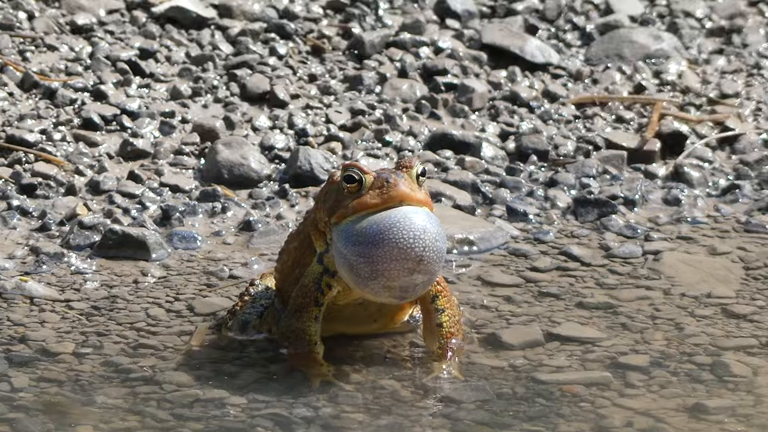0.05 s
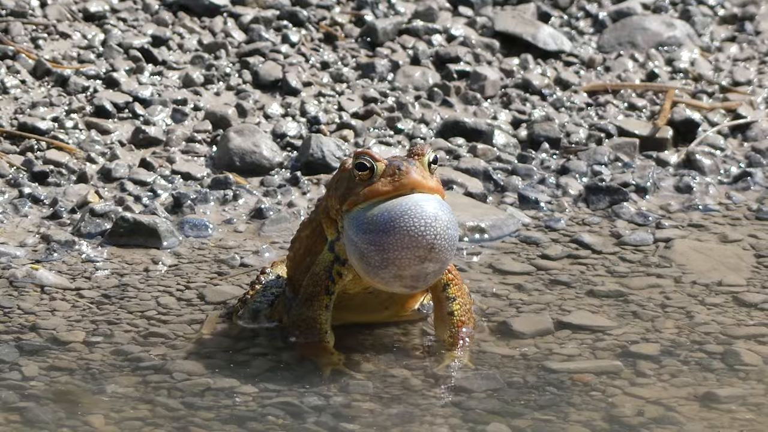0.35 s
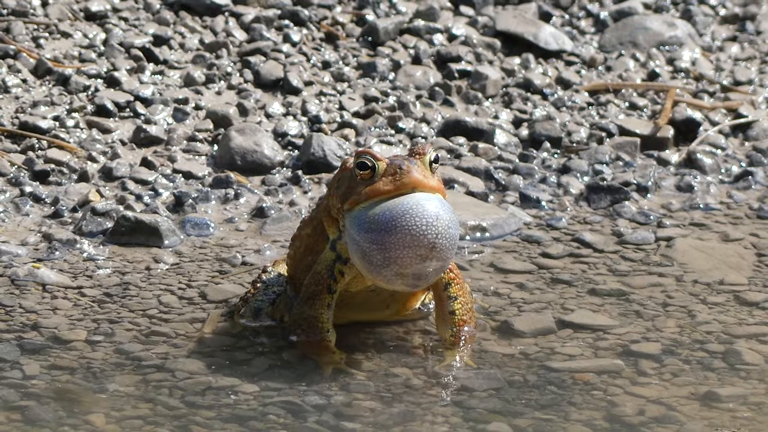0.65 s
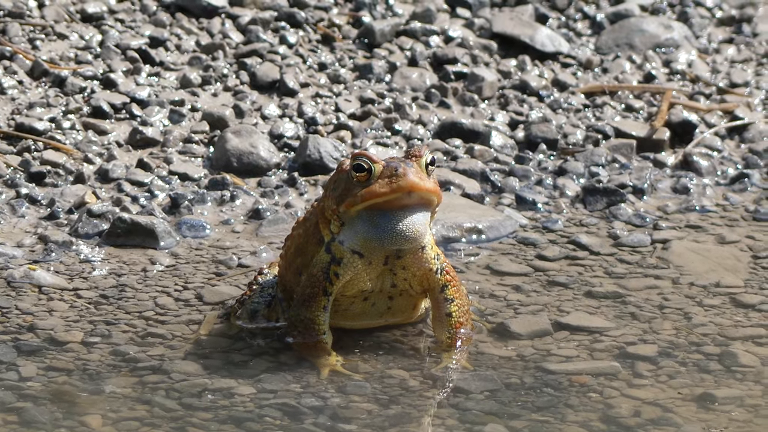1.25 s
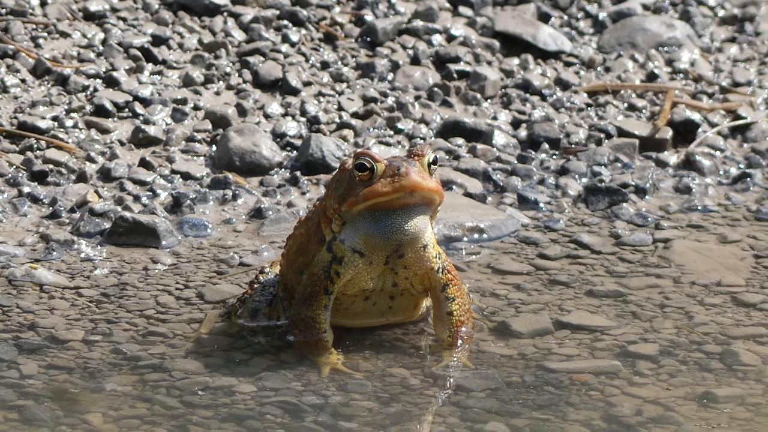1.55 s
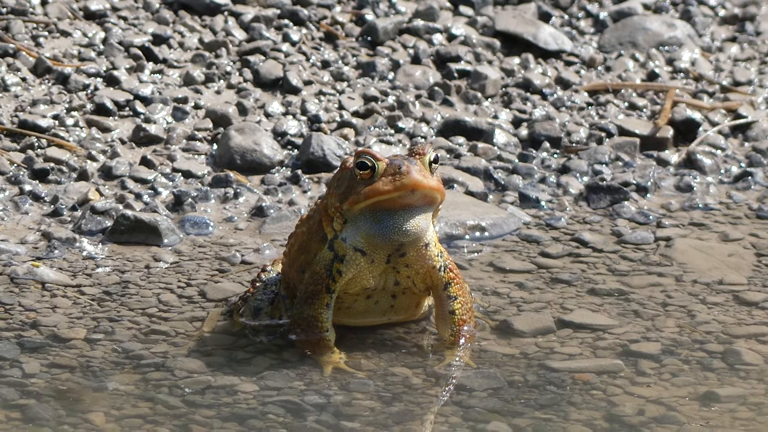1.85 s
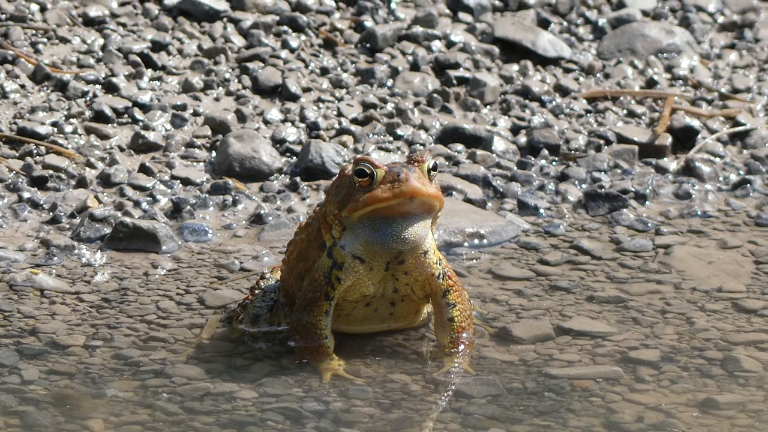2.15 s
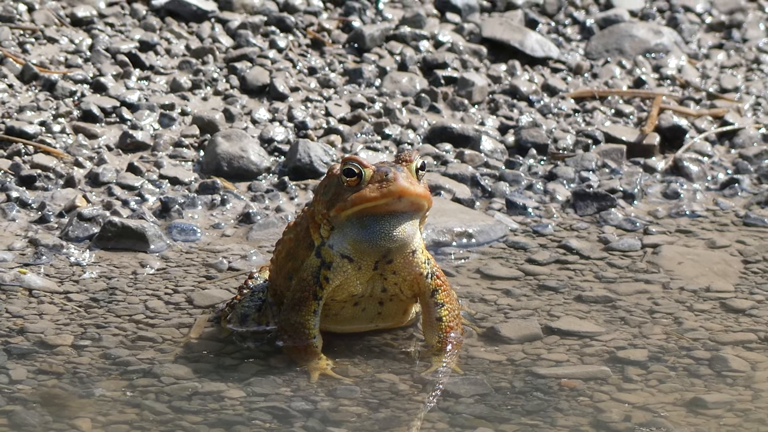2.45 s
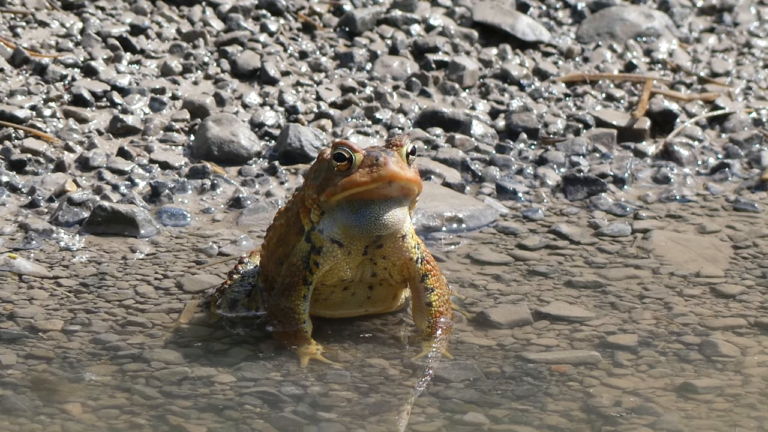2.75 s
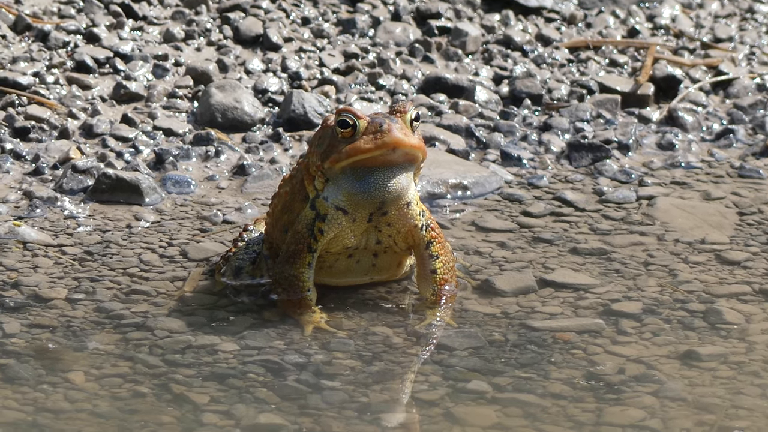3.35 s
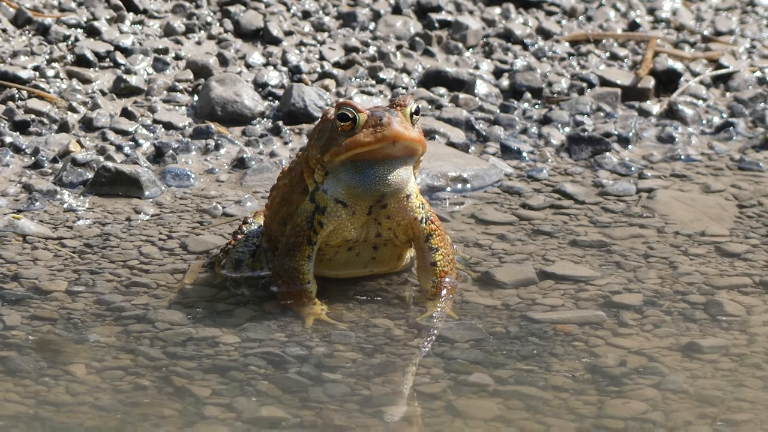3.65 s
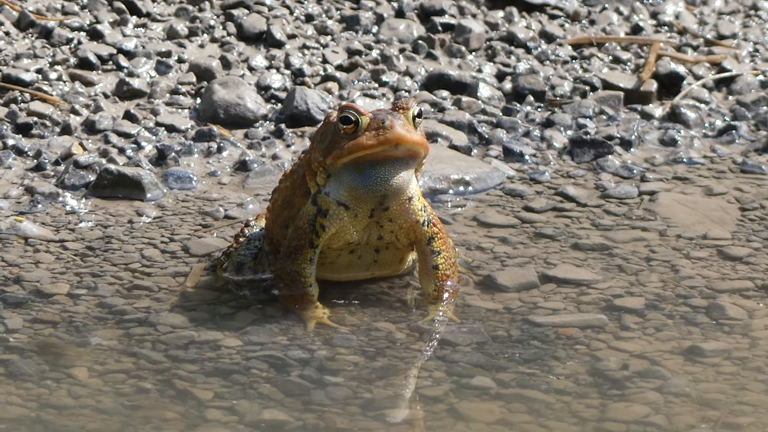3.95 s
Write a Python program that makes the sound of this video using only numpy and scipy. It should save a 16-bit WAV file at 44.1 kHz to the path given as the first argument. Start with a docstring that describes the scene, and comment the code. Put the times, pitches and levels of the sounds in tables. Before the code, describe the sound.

A toad's high, pulsing trill sounds close to the microphone and soon ends, leaving a softer, steady trill to the left. As that runs down, a farther toad starts and one bird chirp echoes across the quiet pond.

```python
"""Pond edge, over quiet outdoor hiss, a far hum and faint plops and ticks.
A close toad stutters through the end of its trill (to 0.8 s), its vocal sac ringing after each pulse.
A second toad, left, trills evenly from the start and runs down by 3.7 s; a distant bird whistles faintly.
From 3.3 s a third toad, further off, takes over.
At 3.4 s a bird gives one sharp chirp from both sides of its syrinx; the trees echo it."""
import sys
import numpy as np
from scipy import signal
from scipy.fft import rfft, irfft
from scipy.io import wavfile

SR = 44100
rng = np.random.default_rng(int(sys.argv[2]) if len(sys.argv) > 2 else 0)


def digitize_waveform(pressure):
    """Quantize a signal to 16-bit integers and store it at the path in sys.argv[1].

    Rows of a 2-D input are taken as channels; values are limited to [-1, 1].
    """
    field = np.atleast_2d(pressure).T
    bounded = np.clip(field, -1, 1)
    quanta = np.round(bounded * 32767).astype(np.int16)
    wavfile.write(sys.argv[1], SR, quanta)


N = 176400
T = np.arange(N) / SR


def amp(db):
    """dB to gain."""
    return 10 ** (np.asarray(db) / 20)


def unit_rms(x):
    """Scale to rms 1."""
    return x / np.sqrt(np.mean(abs(x) ** 2) + 1e-20)


def log_interp(points, hz):
    """Interpolate (f/Hz, value) points over log frequency."""
    f, value = np.transpose(points)
    return np.interp(np.log(hz + 1), np.log(f + 1), value)


def add(mix, at_s, sound):
    """Mix a sound in, in place."""
    part = mix[max(round(at_s * SR), 0):][:len(sound)]
    part += sound[:len(part)]


def colour(x, spectrum):
    """Filter by (f/Hz, level/dB) points; white noise keeps its power."""
    gain = unit_rms(amp(log_interp(spectrum, np.fft.rfftfreq(2 * N, 1 / SR))))
    return irfft(rfft(x, 2 * N) * gain)[..., :N]


def band(hz, half_width_hz):
    """Noise band, rms 1."""
    detune = (np.fft.rfftfreq(N, 1 / SR) - hz) / half_width_hz
    return unit_rms(irfft(rfft(rng.standard_normal(N)) / (1 + detune ** 2), N))


def place(x, left_db, right_db, lag_rad):
    """Pan by level and a phase lag on the right."""
    lagged = (signal.hilbert(x) * np.exp(-1j * lag_rad)).real
    return np.array([amp(left_db) * x, amp(right_db) * lagged])


def echo(x, t60_s, delay_s):
    """Diffuse reflections, independent per side, at the source's rms."""
    t = np.arange(SR) / SR
    tails = rng.standard_normal((2, SR)) * amp(-60 * t / t60_s) * (t > delay_s)
    return np.std(x) * np.array([unit_rms(signal.fftconvolve(x, tail)[:N]) for tail in tails])


def air(hiss_db=-46.0, hum_hz=73.0, hum_db=-61.5, whine_hz=474, whine_db=-65):
    """Soft outdoor hiss, far engine hum, wavering far tone."""
    # hiss spectrum: f/Hz, density/dB
    spectrum = [(25, -19.5), (50, -9), (90, -3), (130, -3.5), (250, 1.5), (400, -1), (620, -5), (900, -0.5),
                (1500, 3.5), (2200, -19.5), (3200, -14.5), (4800, -23), (6500, -21.5), (7700, -27),
                (10000, -22), (12500, -26), (15500, -27)]
    # hiss stereo image: f/Hz, left-right correlation
    correlation = [(40, -0.49), (130, -0.61), (290, -0.74), (640, -0.0069), (1400, 0.71), (3100, 1),
                   (6800, 0.5), (15000, 0.058)]
    left, independent = rfft(rng.standard_normal((2, N)))
    rho = np.clip(log_interp(correlation, np.fft.rfftfreq(N, 1 / SR)), -1, 1)
    right = rho * left + np.sqrt(1 - rho ** 2) * independent
    hiss = colour(irfft(np.array([left, right]), N), spectrum) * amp(hiss_db + 0.62 * band(0, 0.81))
    hum = amp(hum_db) * np.sin(2 * np.pi * hum_hz * T) * (1 + .15 * band(0, 3))
    return hiss + place(hum, -1.3, 1.9, 0.47) + amp(whine_db) * band(whine_hz, 4.5)


def distant_bird(arch=0.54, blur_hz=360):
    """Faint rising and falling whistles, blurred by distance."""
    # calls: t/s, length/s, top f/Hz, level/dB
    calls = [(1.192, 0.53, 3850, -59.5), (2.657, 0.072, 3550, -63), (2.827, 0.16, 3030, -56),
             (3.871, 0.15, 5020, -63.5)]
    whistles = np.zeros(N)
    for start_s, length_s, top_hz, db in calls:
        swell = np.sin(np.pi * np.arange(0, length_s, 1 / SR) / length_s)
        phase = 2 * np.pi * np.cumsum(top_hz * (1 - arch + arch * swell)) / SR
        blur = band(0, blur_hz)[:len(swell)]
        add(whistles, start_s, amp(db) * np.sqrt(abs(swell)) * blur * np.sin(phase))
    return place(whistles, 4.6, -2.3, 0)


def shore(plop_rise_s=0.0041, tick_rise_s=0.0006, tick_decay_s=0.0035):
    """Waterline plops and wet-gravel ticks: decaying noise bursts."""
    # plops and bumps: t/s, f/Hz, level/dB, decay/s
    plop_events = [(0.394, 527, -45, 0.03), (0.822, 348, -44.5, 0.019), (1.035, 476, -44, 0.021),
                   (3.714, 137, -36, 0.01), (3.926, 109, -48.5, 0.044)]
    # gravel ticks: t/s, level/dB
    tick_events = [(0.23, -52.5), (1.069, -48), (1.923, -51)]
    # tick spectrum: f/Hz, level/dB
    tick_spectrum = [(1000, -22.5), (3500, -2), (6000, -2), (11000, -14), (16000, -18.5)]
    plops, ticks = np.zeros((2, N))
    t = np.arange(0, .2, 1 / SR)
    for start_s, hz, db, decay_s in plop_events:
        envelope = amp(db) * (1 - np.exp(-t / plop_rise_s)) * np.exp(-t / decay_s)
        add(plops, start_s, envelope * unit_rms(band(hz, .3 * hz)[:len(t)]))
    for start_s, db in tick_events:
        envelope = amp(db) * (1 - np.exp(-t / tick_rise_s)) * np.exp(-t / tick_decay_s)
        add(ticks, start_s, envelope * rng.standard_normal(len(t)))
    return place(plops + colour(ticks, tick_spectrum), 0, 0, 0)


def syrinx_side(curve, rough, waver=0.00484):
    """Gain and phase of one whistle, rougher below its top pitch."""
    at_s, hz, db = np.transpose(curve)
    pitch_hz = np.interp(T, at_s, hz)
    pitch_hz *= 1 + waver * band(0, 214) + rough * (1 - pitch_hz / hz.max()) * band(0, 547)
    return amp(np.interp(T, at_s, db, left=-200, right=-200)), 2 * np.pi * np.cumsum(pitch_hz) / SR


def bird(rasp_db=-39, sum_db=-19, octave_db=-21, trees_db=-6):
    """A raspy start opens into two whistles and their sum tone; the trees ring on."""
    # lower whistle: t/s, f/Hz, level/dB
    low_curve = [(3.425, 2515, -47), (3.44, 3170, -41), (3.449, 3950, -35.5), (3.462, 3872, -31),
                 (3.475, 3833, -28.5), (3.479, 3795, -32), (3.485, 3935, -41), (3.492, 2845, -41),
                 (3.503, 2150, -44)]
    # upper whistle: t/s, f/Hz, level/dB
    high_curve = [(3.43, 4306, -62), (3.437, 5190, -32), (3.443, 6220, -36), (3.452, 6400, -35),
                  (3.46, 6450, -40), (3.478, 6500, -50), (3.5, 6260, -46)]
    # rasp spectrum: f/Hz, level/dB
    rasp_spectrum = [(100, -55), (1500, -5), (2800, -14), (5500, 1), (6800, -7), (8000, -13.5),
                     (12000, -15), (16000, -26)]
    # tree echo spectrum: f/Hz, level/dB
    tree_spectrum = [(1000, 7), (4000, -12), (6400, -8), (7000, -13), (16000, -24)]
    rasp_peak_s, rise_s, decay_s = 3.438, .028, 0.029
    low, low_phase = syrinx_side(low_curve, rough=.36)
    high, high_phase = syrinx_side(high_curve, rough=.14)
    dry = low * np.sin(low_phase) + high * (np.sin(high_phase) + amp(octave_db) * np.sin(2 * high_phase))
    dry += amp(sum_db) * np.sqrt(low * high) * np.sin(low_phase + high_phase)
    t = T - rasp_peak_s
    burst = np.clip(1 + t / rise_s, 0, 1) * np.exp(-np.maximum(t, 0) / decay_s)
    dry += amp(rasp_db) * burst * colour(rng.standard_normal(N), rasp_spectrum)
    trees = np.std(dry) * unit_rms(colour(echo(dry, 1.0, 0.022), tree_spectrum))
    return place(dry, 2.2, -2.7, 0) + amp(trees_db) * trees


def trill(rate, voice, first_s, last_s, uneven_db, jitter_s, snap_db, rasp_db,
          ring_db, ring_s, sharp_hz, settle_s):
    """Even pulses: the throat snaps open, the vocal sac swells on one tone and a faint tail lingers after it."""
    # throat modes: f/Hz, level/dB, decay/s
    throat_modes = [(814, -24.5, 0.0043), (901, -21, .004), (1584, -15.5, 0.0032), (1588, -27, 0.0048),
                    (2433, -23, 0.0036), (2602, -24, 0.004), (2895, -23, 0.0029), (3530, -36, .0018),
                    (3950, -34, .0015), (4090, -32.5, .0018)]
    # rasp spectrum: f/Hz, level/dB
    rasp_spectrum = [(100, -33), (500, -26.5), (850, 13.5), (1050, -22), (1650, 9), (2050, -14), (2800, 7),
                     (3400, -10), (4200, -0.5), (4800, -36.5), (9000, -49)]
    snap_s = .0005
    peak_s, width_s, ref_rate_hz = 0.004, 0.0026, 56  # swell shape at this pulse rate
    cycles = np.cumsum(np.interp(T, *np.transpose(rate)) * (T > first_s)) / SR
    starts_s = T[1:][np.diff(np.ceil(cycles)) > 0]
    starts_s = starts_s[starts_s < last_s]
    at_s, level_db, pitch_hz = np.transpose(voice)
    t = np.arange(0, .02, 1 / SR)
    opening = 1 - np.exp(-t / snap_s)
    throat = sum(amp(db) * np.exp(-t / decay_s) * np.sin(2 * np.pi * hz * t)
                 for hz, db, decay_s in throat_modes)
    tones, rasp = np.zeros((2, N))
    for start_s in starts_s:
        d_level, d_time, d_pitch, d_width, d_ring, d_snap = rng.standard_normal(6)
        gain = amp(np.interp(start_s, at_s, level_db) + uneven_db * d_level)
        hz = np.interp(start_s, at_s, pitch_hz) * (1 + 0.0053 * d_pitch)
        hz = hz + sharp_hz * np.exp(-t / settle_s)
        stretch = ref_rate_hz / np.interp(start_s, *np.transpose(rate)) * (1 + 0.04 * d_width)
        swell = np.exp(-((t / stretch - peak_s) / width_s) ** 2)
        tail = amp(ring_db + 2 * d_ring) * np.exp(-abs(t - 2 * peak_s) / ring_s) * (1 - t / t[-1])
        tone = (swell + tail) * np.sin(2 * np.pi * np.cumsum(hz) / SR)
        start_s += jitter_s * d_time
        add(tones, start_s, gain * opening * (tone + amp(snap_db + d_snap) * throat))
        add(rasp, start_s, 2 * gain * opening * np.exp(-2 * t / peak_s))
    return tones + amp(rasp_db) * colour(rasp * rng.standard_normal(N), rasp_spectrum)


def far_toad(ground_db=-17):
    """Fainter trill, swelling and rising in pitch."""
    # pulse rate: t/s, rate/Hz
    rate = [(3.3, 65.1), (4, 65.1)]
    # sac tone: t/s, level/dB, f/Hz
    voice = [(3.3, -44, 1215), (3.5, -31, 1235), (3.75, -27.5, 1250), (4, -28, 1295)]
    dry = trill(rate, voice, first_s=3.3122, last_s=4.1, uneven_db=1.2, jitter_s=0.00041, snap_db=-8.5,
                rasp_db=-18, ring_db=-11, ring_s=0.0091, sharp_hz=302, settle_s=0.0025)
    wet = amp(ground_db) * echo(dry, .06, 0.012)
    return place(dry, 0, -21.5, 0.58) + wet * amp([[0], [-5]])


def left_toad(ground_db=-24, pond_db=-30):
    """Long trill that slows and stops."""
    # pulse rate: t/s, rate/Hz
    rate = [(0.0, 72.55), (0.45, 69.98), (0.9, 66.9), (1.25, 66.53), (1.6, 65.21), (2.0, 63.94),
            (2.4, 62.86), (2.8, 62.3), (3.3, 61.82), (3.62, 59.79), (3.73, 51.58)]
    # sac tone: t/s, level/dB, f/Hz
    voice = [(0, -17.5, 1319), (0.499, -17.5, 1280), (0.999, -17, 1280), (1.999, -17, 1269),
             (3.3, -17.5, 1253), (3.72, -17.5, 1248)]
    dry = trill(rate, voice, first_s=.0063, last_s=3.728, uneven_db=0.53, jitter_s=0.00015, snap_db=0,
                rasp_db=-29, ring_db=-7.0, ring_s=.007, sharp_hz=190, settle_s=0.0011)
    wet = amp(ground_db) * echo(dry, .06, 0.0076) + amp(pond_db) * echo(dry, .8, 0.01)
    return place(dry, 0, -11.5, 1.63) + wet * amp([[0], [-4]])


def near_toad(voice_db=-0.67, rasp_db=-1, ground_db=-25, pond_db=-35, roundness=1.16, flutter=0.01):
    """Uneven, nearly pure pulses: each starts sharp, buzzes most in its middle and leaves the sac ringing."""
    # pulses: t/s, length/s, level/dB, onset f/Hz (offset from tone_hz counts double), rasp/dB
    pulses = [(0.0079, 0.0105, -8.2, 1615, -53), (0.0247, 0.0115, -9.3, 1620, -52),
              (0.0392, 0.0099, -9.6, 1630, -46), (0.0603, 0.0088, -10.6, 1660, -48),
              (0.0868, 0.0142, -9.3, 1600, -48), (0.1085, 0.0132, -8.7, 1620, -48),
              (0.1255, 0.0115, -8.8, 1635, -52), (0.1472, 0.0058, -11.5, 1720, -43),
              (0.1525, 0.0055, -17.5, 1590, -45), (0.1709, 0.0096, -10.3, 1600, -42),
              (0.1841, 0.0114, -8.0, 1615, -50), (0.2056, 0.0119, -9.8, 1615, -55),
              (0.2251, 0.0115, -9.4, 1610, -55), (0.2469, 0.0102, -10.2, 1640, -48),
              (0.2616, 0.0117, -9.2, 1620, -52), (0.2805, 0.0116, -9.8, 1605, -54),
              (0.303, 0.012, -10.9, 1600, -46), (0.3204, 0.0121, -8.7, 1615, -51),
              (0.3431, 0.0094, -10.4, 1660, -46), (0.3569, 0.0116, -8.7, 1620, -52),
              (0.3893, 0.0139, -9.5, 1585, -49), (0.4125, 0.0115, -10.4, 1595, -49),
              (0.43, 0.0115, -10.1, 1595, -51), (0.4495, 0.0111, -12.4, 1590, -49),
              (0.464, 0.0102, -9.4, 1625, -49), (0.481, 0.0098, -9.6, 1600, -53),
              (0.5082, 0.014, -9.5, 1595, -51), (0.5242, 0.0125, -9.0, 1610, -47),
              (0.5416, 0.011, -10.7, 1610, -54), (0.5583, 0.0102, -9.9, 1610, -53),
              (0.5741, 0.0108, -10.8, 1610, -52), (0.5911, 0.0108, -10.3, 1605, -52),
              (0.6041, 0.0101, -9.1, 1630, -46), (0.621, 0.0098, -10.5, 1605, -53),
              (0.6381, 0.0105, -10.3, 1615, -52), (0.6534, 0.0089, -10.0, 1635, -50),
              (0.6691, 0.0096, -10.6, 1605, -52), (0.6865, 0.0101, -9.4, 1600, -53),
              (0.7055, 0.0113, -9.3, 1605, -51), (0.7257, 0.0111, -10.6, 1615, -44),
              (0.744, 0.0109, -8.7, 1615, -52), (0.7648, 0.0123, -9.2, 1605, -54),
              (0.7858, 0.0124, -9.0, 1610, -53), (0.8109, 0.0122, -11.4, 1590, -44)]
    # harmonics 2-4: level/dB
    overtones_db = [-36, -45, -57]
    # voice cracks, brief flicks in pitch: t/s, f/Hz, level/dB, rasp/dB
    cracks = [(0.0601, 1900, -26.5, -45), (0.1524, 1890, -20, -39), (0.248, 1900, -28, -48.5),
              (0.341, 1880, -24.5, -46), (.7315, 2000, -30, -43.5), (0.8175, 1450, -27, -37)]
    # rasp spectrum: f/Hz, level/dB
    rasp_spectrum = [(100, -37), (600, -9.5), (1100, -0.5), (1900, -7.5), (2800, -0.5), (3700, -12.5),
                     (4650, -5.5), (5300, -28), (9000, -41.5), (16000, -40)]
    tone_hz, sag_hz, settle_s = 1588, 70.5, 0.0025
    buzz_mean_sag_hz, buzz_wobble_rad = 18, .12  # overtones only, times harmonic number
    sac_hz, sac_db, sac_s = 1611, -17, .002
    crack_half_s = 0.0012
    voice, rasp = np.zeros((2, N))
    for start_s, length_s, db, onset_hz, grit_db in pulses:
        t = np.arange(0, length_s, 1 / SR)
        progress = t / length_s
        hz = tone_hz - sag_hz * (progress - .5) + 2 * (onset_hz - tone_hz) * np.exp(-t / settle_s)
        phase = 2 * np.pi * (np.cumsum(hz) / SR + rng.random())
        wobble = np.sin(2 * np.pi * (rng.uniform(100, 400) * t + rng.random()))
        buzz_phase = phase + buzz_wobble_rad * wobble - 2 * np.pi * buzz_mean_sag_hz * t * progress
        buzz = sum(amp(over_db) * np.sin(k * buzz_phase) for k, over_db in enumerate(overtones_db, 2))
        tone = np.sin(np.pi * progress ** 0.88) ** roundness * (1 + flutter * wobble) * np.sin(phase)
        add(voice, start_s, amp(db) * (tone + np.sin(np.pi * progress) ** .5 * buzz))
        add(rasp, start_s, amp(grit_db) * np.sin(np.pi * progress ** 0.74))
        t = np.arange(0, .03, 1 / SR)
        ring = t / sac_s * np.exp(1 - t / sac_s) * np.sin(2 * np.pi * (sac_hz * t + rng.random()))
        add(voice, start_s + length_s - sac_s, amp(db + sac_db) * ring)
    for at_s, hz, db, grit_db in cracks:
        t = np.arange(-3 * crack_half_s, 3 * crack_half_s, 1 / SR)
        flick = np.exp(-(t / crack_half_s) ** 2)
        add(voice, at_s + t[0], amp(db) * flick * np.sin(2 * np.pi * (hz * t + rng.random())))
        add(rasp, at_s + t[0], amp(grit_db) * flick)
    dry = amp(voice_db) * voice + amp(rasp_db) * colour(rasp * rng.standard_normal(N), rasp_spectrum)
    wet = amp(ground_db) * echo(dry, 0.13, 0.0023) + amp(pond_db) * echo(dry, 0.9, 0.0067)
    return place(dry, 0.84, 0, 0.07) + wet


def scene():
    """Three toads, two birds, shore and air; stereo."""
    return near_toad() + left_toad() + far_toad() + bird() + distant_bird() + shore() + air()


def record(dry):
    """Band limit: FIR low-pass."""
    cutoff_hz = 15800
    lowpass = signal.firwin(511, cutoff_hz, window=("kaiser", 9), fs=SR)
    return signal.oaconvolve(dry, lowpass[None], "same")


dry = scene()
out = record(dry)
digitize_waveform(out)
```